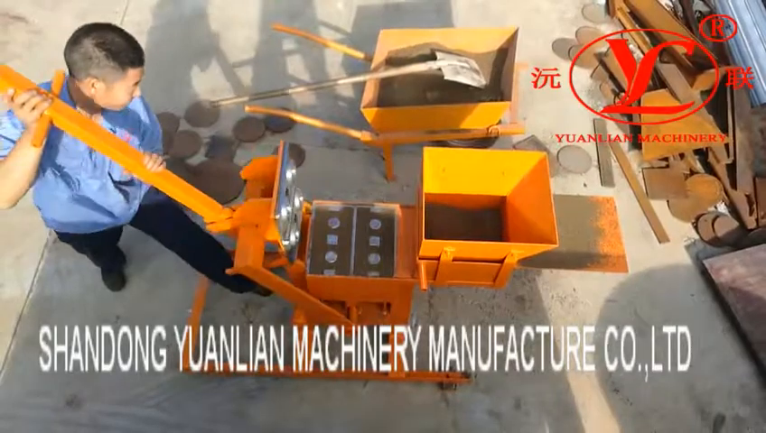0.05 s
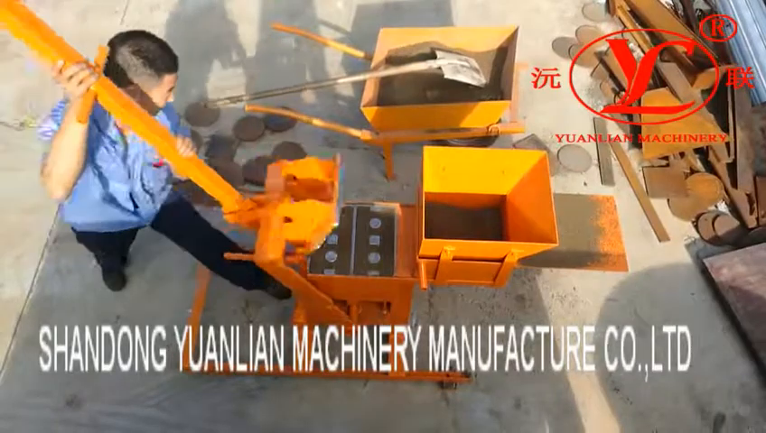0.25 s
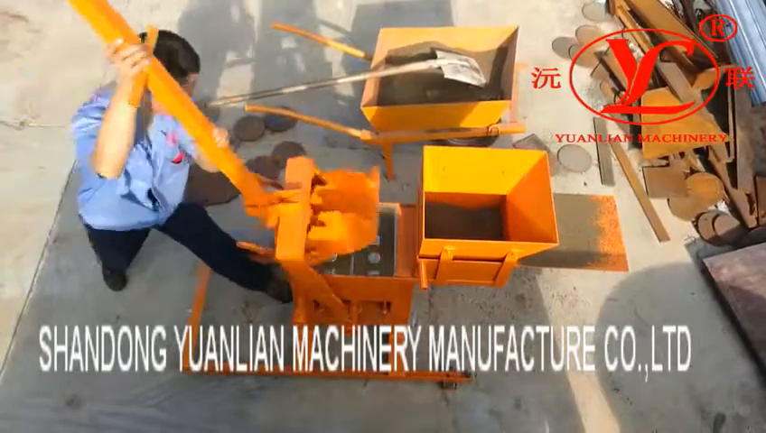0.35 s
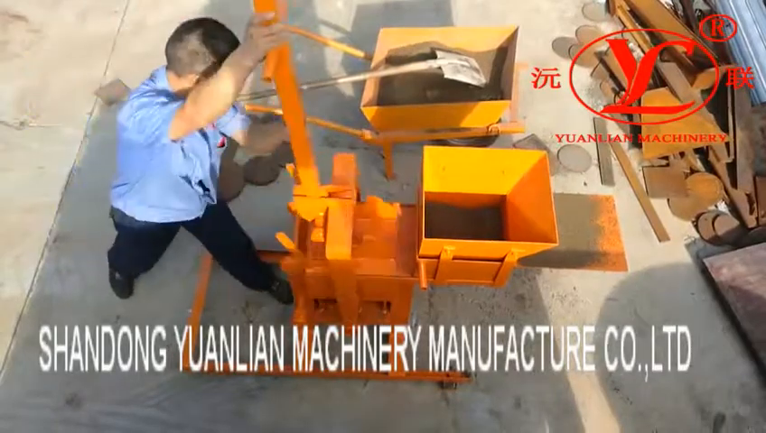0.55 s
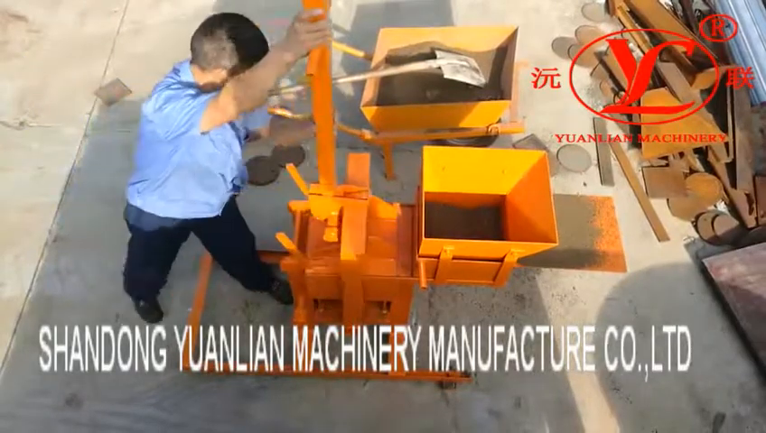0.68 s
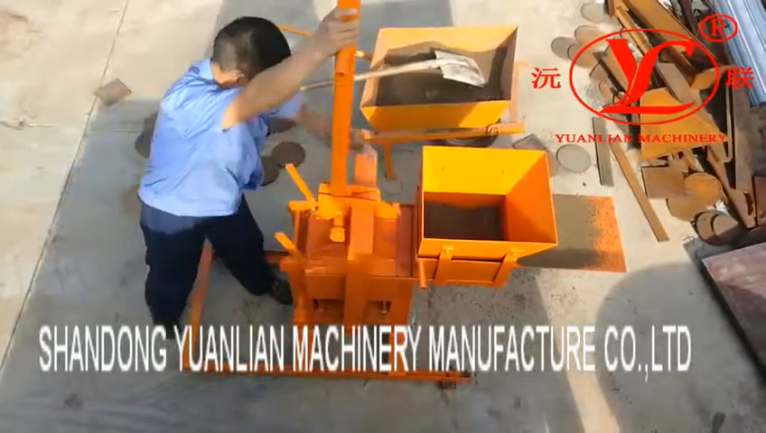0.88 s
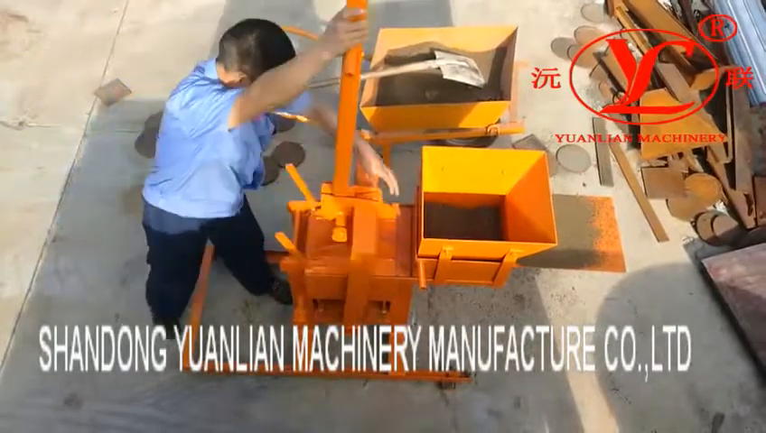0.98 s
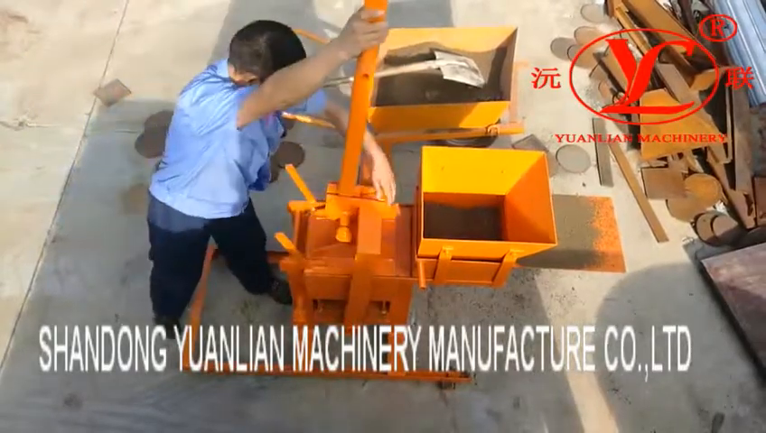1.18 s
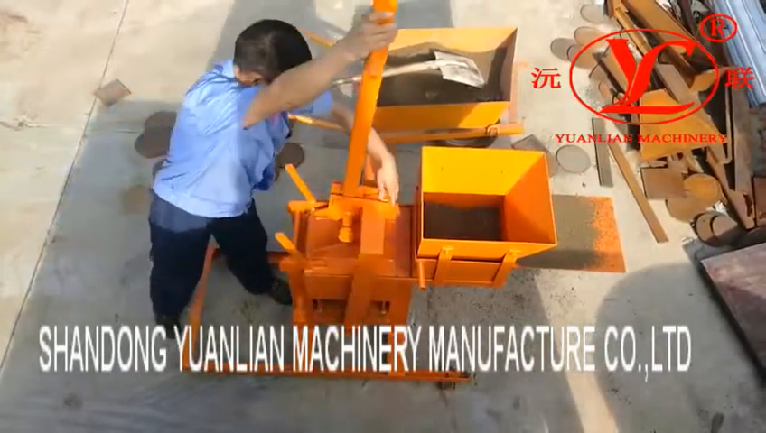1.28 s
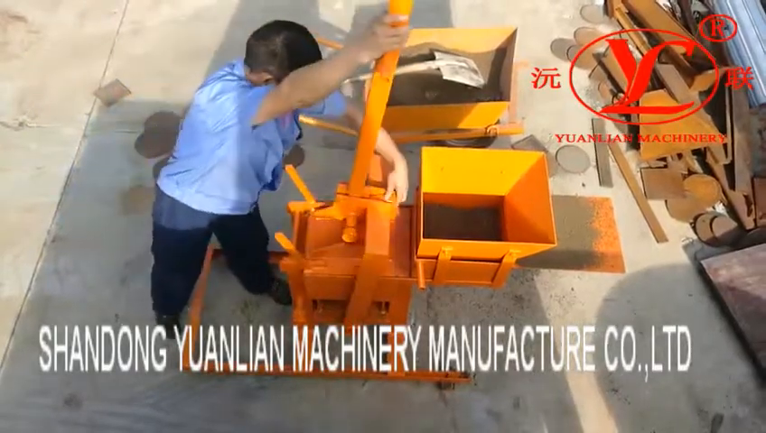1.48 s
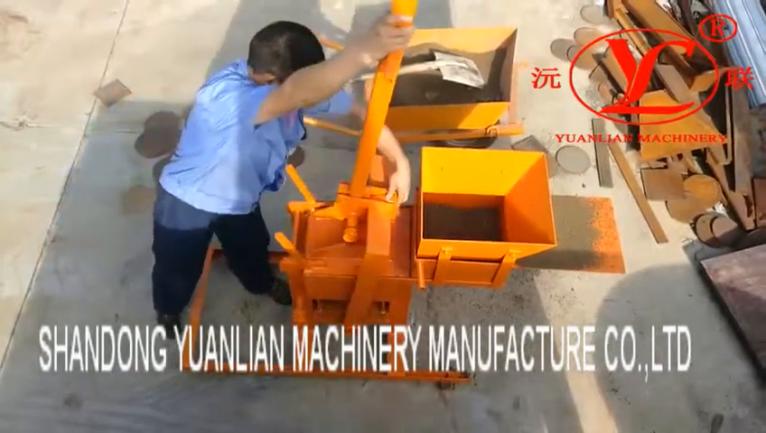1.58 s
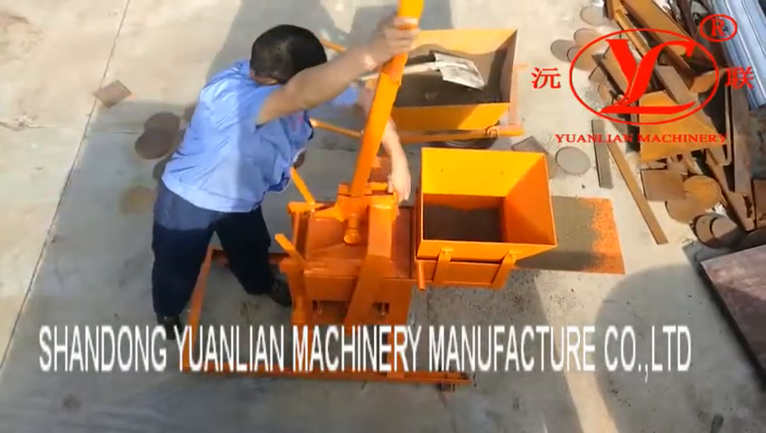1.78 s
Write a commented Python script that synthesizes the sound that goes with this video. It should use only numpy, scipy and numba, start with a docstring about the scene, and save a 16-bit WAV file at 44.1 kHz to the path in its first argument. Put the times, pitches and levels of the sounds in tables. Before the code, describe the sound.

One loud, crashing metal clank from a closing press lid, chattering and bouncing once, then a low fading ring in an open yard, over faint far-off machine whine and rumble, picked up by a nearby phone.

```python
"""A yard: a heavy steel lid drops onto a press mould; its edges land within 50 ms, chatter, ring, rebound once.
Pushes and rattle excite lid and frame modes; decaying noise gives crash, crack and yard echo.
Far off, a cutting or grinding machine: grit through resonances, plus hiss, over a low town rumble.
Faint thin tones and one soft scuff are added.
The phone's gain control ducks at the clank and stays low; the loudest peaks clip softly."""
import sys
import numpy as np
from scipy import signal
from scipy.fft import rfft, irfft
from scipy.io import wavfile
from scipy.ndimage import uniform_filter1d
from numba import njit

SR = 44100
rng = np.random.default_rng(int(sys.argv[2]) if len(sys.argv) > 2 else 0)


def int16_out(signal):
    """Quantize to a 16-bit WAV file."""
    q = np.round(np.clip(np.atleast_2d(signal).T, -1, 1) * 32767)
    wavfile.write(sys.argv[1], SR, q.astype(np.int16))


N = 81585

# town rumble, relative spectrum: freq_hz, density_db
TOWN_SPECTRUM = [(25, -5), (100, -2.1), (270, -3), (400, -7.5), (600, -11), (900, -5), (1700, -5.5),
                 (2300, -55)]
TOWN_DB = -42.5

# far machine hiss, relative spectrum: freq_hz, density_db
HISS_SPECTRUM = [(1200, -41.5), (1750, -68), (2000, -4), (2400, -3.5), (3100, -7.5), (3600, -9.5),
                 (4500, -4), (4950, -12), (5400, -8), (6600, -14.5), (7500, -5.5), (9000, -20.5),
                 (11500, -19), (13000, -31), (15500, -44)]
# far machine resonances: pitch_hz
MACHINE_PITCHES = [1960, 2015, 2095, 2270, 2338, 2405, 2475, 2745, 2860, 3397, 3500, 3640, 4300, 5300, 6200,
                   7470, 8500, 10050]
# same resonances: width_hz, relative_level_db
MACHINE_RINGS = [(11.4, 1.5), (14, -68), (18, 0.5), (34, 3), (23.1, 2), (17, -14), (17.3, 0.5),
                 (25.1, -3.5), (20, -9), (23.2, -2.5), (29.7, -2.5), (28, -4), (55.6, -6.5), (74, 1.5),
                 (60, -10), (75, -7.5), (215, -2), (120, -17)]
# far machine load: time_s, gain_db
MACHINE_LOAD = [(0, 0.7), (.2, 0.3), (0.502, 3), (.75, -0.3), (1.099, 0.4), (1.45, 1), (1.85, 0)]
# left/right shared power of the far sounds: freq_hz, share_0_to_1
FAR_LIKENESS = [(60, .99), (130, .98), (290, .85), (640, .3), (1400, .15), (3000, .15)]
# tilt of the far sounds: freq_hz, left_minus_right_db
FAR_PAN = [(200, -0.9), (1300, -0.9), (2400, 9), (4400, -0.7), (9000, 1.1)]
HISS_DB, MACHINE_RINGS_DB = -32.5, -30
# dB per unit of random walk (flicker, waver) or of exponential draw (grit)
FLICKER_DB, WAVER_DB, GRIT_DB = 2.5, 2, 2

# faint thin tones: start_s, length_s, pitch_hz, level_db
SQUEAKS = [(-.05, 0.74, 2025, -26), (0.682, 0.3, 2337, -32), (0.979, 0.12, 2873, -33),
           (1.075, 0.18, 906, -43.5), (1.24, 0.084, 3520, -37), (1.277, .3, 2301, -31),
           (1.573, 0.25, 2290, -34.5)]
# soft shuffle near the press: start_s, length_s, level_db
SCUFFS = [(1.522, .045, -43)]
# shuffle, relative spectrum: freq_hz, density_db
SCUFF_SPECTRUM = [(100, -8), (400, 0.1), (1200, -4), (2500, -14), (6000, -40), (9000, -70)]

# lid landings: start_s, level_db, nominal_contact_ms, treble_crack_db
LANDINGS = [(0.239, -17, 0.11, -31), (.245, -4, 0.61, -11), (0.248, -6.5, 0.18, -8),
            (0.255, -7.5, 0.74, -8.5), (0.2583, -4, 0.55, -7.5), (0.2614, -7, 0.39, -3.5),
            (0.265, 0, 0.96, -7), (0.269, -10.5, 0.27, -9), (0.272, -5.5, 0.36, -13.5),
            (.275, -3.5, 0.13, -19), (.278, -2.5, 0.19, -32), (0.284, -12.5, 0.12, -42),
            (.288, -29, 0.13, -41), (0.365, -19.5, .1, -19.5)]
# lid and mould modes: pitch_hz
LID_PITCHES = [553, 1035, 1084, 1153, 1198, 1403, 1525, 1962, 2240, 2402, 2467, 2853, 3990, 4780]
# same modes: relative_level_db, t60_s, left_minus_right_db
LID_MODES = [(-12.5, .16, -4), (-38, 0.12, 2), (-27, 0.099, -5), (3, 0.14, 0.5), (-4, 0.18, -2),
             (-12.5, 0.1, -8), (-22, 0.24, -9), (-12, 0.11, 3.0), (-7.5, 0.077, 20.5), (-2, 0.054, 25),
             (-10, .18, 12), (-7, 0.087, -10), (-3.5, 0.017, -28.5), (-9.5, 0.036, -22)]
# lid weight settling on the frame: start_s, level_db, nominal_contact_ms
THUDS = [(.247, -23, 2), (.259, -10.5, 1.54)]
# frame modes: pitch_hz
FRAME_PITCHES = [45, 181, 250, 272, 289, 306]
# same modes: level_db, t60_s
FRAME_MODES = [(-10, 0.1), (-18, 0.71), (-21, 0.52), (-24.5, 2.3), (1.5, 0.45), (-2.5, 0.35)]
# broad crash, relative spectrum: freq_hz, density_db
CRASH_SPECTRUM = [(30, -20), (130, -28), (300, -16), (650, -14), (1100, 0), (2500, -2), (3200, -14),
                  (5000, -30)]
# treble crack, relative spectrum: freq_hz, density_db
CRACK_SPECTRUM = [(2000, -18), (3200, -3), (4000, 1), (5000, 2), (6500, -5), (9000, -8.5), (11500, -10.5),
                  (15500, -71)]
# yard echo, relative spectrum: freq_hz, density_db
YARD_SPECTRUM = [(59, -60), (100, -23.5), (292, 3.5), (505, -14), (1160, -11), (1680, -13.5), (2320, -10),
                 (3650, -18.5), (9000, -41), (11700, -60), (19800, -120)]
# left/right shared power of crash, crack and yard: freq_hz, share_0_to_1
LID_LIKENESS = [(40, 0.8), (300, 0.95), (640, 0), (1400, 1), (3000, 0.08), (7000, 0.07)]
# tilt of crash, crack and yard: freq_hz, left_minus_right_db
CRASH_PAN = [(300, -1), (1200, -1.2), (2400, 8.5), (4400, 0.5), (12000, -3)]
LID_DB, CRASH_DB = -12, 0
CHATTER_DB, CHATTER_T60_S, CHATTER_SPREAD_DB = -12.5, 0.015, 3.0
CRASH_T60_S, CRACK_T60_S = 0.066, 0.06
WALL_DELAY_S, WALL_DB, WALL_LOWPASS_HZ = 0.12, -23.5, 1260
YARD_DB, YARD_T60_S, YARD_DELAY_S = -19.5, 0.85, 0.018
FAR_LAG_MS, LID_LAG_MS = 0.2965, 0.06  # left port hears later

DUCK_DB, DUCK_START_DB, DUCK_ATTACK_S, DUCK_RELEASE_S = -7, -17, 0.014, 40
QUICK_DB, QUICK_RELEASE_S = 1, 0.02
CLIP_AMPLITUDE, TOP_HZ = 1.03, 15400


def undb(db):
    """dB to gain."""
    return 10 ** (np.asarray(db) / 20)


def level(x, db):
    """Set the rms level."""
    return x * undb(db) / np.sqrt(np.mean(x ** 2))


def over_hz(table):
    """Interpolate a (freq_hz, value) table on log frequency at every transform bin."""
    points = np.array(table, float)
    bins_hz = np.arange(N // 2 + 1) * SR / N
    return np.interp(np.log(bins_hz + 1), np.log(points[:, 0]), points[:, 1])


def late(ms):
    """A delay, as a spectrum."""
    return np.exp(-2j * np.pi * np.arange(N // 2 + 1) * SR / N * ms / 1000)


def ring(x, hz, t60_s):
    """One resonance: its impulse response is a fading sine."""
    pole = np.exp(2j * np.pi * hz / SR - np.log(1000) / (t60_s * SR))
    return signal.lfilter([1], [1, -pole], x + 0j).imag


def walk(rate_hz):
    """Random levels held 1 / rate_hz, smoothed twice over that time."""
    hold = int(SR / rate_hz)
    steps = np.repeat(rng.standard_normal(N // hold + 1), hold)
    return 0.78 * uniform_filter1d(uniform_filter1d(steps, hold), hold)[:N]


def fade(t60_s, count):
    """Exponential decay."""
    return np.exp(-np.log(1000) * np.arange(count) / SR / t60_s)


def grit(spread_db):
    """Dense clicks of uneven size, rms 1."""
    return level(rng.standard_normal(N) * undb(spread_db * rng.exponential(size=N)), 0)


def colour(table):
    """Noise with a given spectrum, rms 1."""
    return level(irfft(rfft(rng.standard_normal(N)) * undb(over_hz(table)), N), 0)


def pushes(table):
    """A rounded push of unit area, scaled by level, for each (start_s, level_db, contact_ms)."""
    out = np.zeros(N)
    for start_s, db, contact_ms in table:
        push = signal.windows.hann(int(max(contact_ms, .05) * SR / 1000) + 3)
        first = int(start_s * SR)
        out[first:first + len(push)] += undb(db) * push / push.sum()
    return out


def after(t60_s, hits):
    """Decaying envelope after hits, summed as power."""
    power = signal.fftconvolve(hits ** 2, fade(t60_s, count=N) ** 2)[:N]
    return np.sqrt(power.clip(0))


def ports(shared, other, likeness, pan, lag_ms):
    """Two microphone ports: left hears shared, right mixes in other; tilt and lag separate them."""
    share = np.clip(likeness, 0, 1)
    shared, other, tilt = rfft(shared), rfft(other), undb(over_hz(pan) / 2)
    left = shared * tilt * late(lag_ms)
    right = (np.sqrt(share) * shared + np.sqrt(1 - share) * other) / tilt
    return np.array([irfft(left, N), irfft(right, N)])


def town():
    """Town rumble: steady noise with a low spectrum."""
    return undb(TOWN_DB) * colour(TOWN_SPECTRUM)


def machine(wavers, load):
    """Flickering grit rings the machine's parts, each wavering alone, beside a steady-grit hiss."""
    drive = grit(GRIT_DB) * undb(FLICKER_DB * walk(90))
    rings = np.zeros(N)
    for waver, hz, (width_hz, _) in zip(wavers, MACHINE_PITCHES, MACHINE_RINGS):
        rings += waver * level(ring(drive, hz, np.log(1000) / np.pi / width_hz), 0)
    highpass = signal.butter(4, 1700., "high", fs=SR, output="sos")
    rings = level(signal.sosfilt(highpass, rings), MACHINE_RINGS_DB)
    hiss = level(irfft(rfft(grit(GRIT_DB)) * undb(over_hz(HISS_SPECTRUM)), N), HISS_DB)
    return load * (rings + hiss)


def far():
    """Town and machine at two ports: the noise draws differ, wavers and load are common."""
    wavers = [undb(db + WAVER_DB * walk(4.65)) for _, db in MACHINE_RINGS]
    load = undb(np.interp(np.arange(N) / SR, *np.array(MACHINE_LOAD).T))
    shared = machine(wavers, load) + town()
    other = machine(wavers, load) + town()
    return ports(shared, other, over_hz(FAR_LIKENESS), FAR_PAN, FAR_LAG_MS)


def swell(start_s, length_s):
    """Rise and fall: root of a half sine."""
    phase = np.clip((np.arange(N) / SR - start_s) / length_s, 0, 1)
    return np.sin(np.pi * phase) ** .5


def squeaks():
    """Faint sines that swell and fade, wavering in level and phase."""
    t = np.arange(N) / SR
    tones = np.zeros(N)
    for start_s, length_s, hz, db in SQUEAKS:
        gain = undb(db + 1.3 * walk(50.3)) * swell(start_s, length_s)
        tones += gain * np.sin(2 * np.pi * hz * t + 1.3 * walk(30.46))
    return ports(tones, tones, 1, FAR_PAN, FAR_LAG_MS)


def scuff():
    """Shuffle: one swell of coloured noise, equal in both ports."""
    return sum(undb(db) * swell(start_s, length_s) for start_s, length_s, db in SCUFFS) * colour(SCUFF_SPECTRUM)


def lid_noise(envelope, spectrum):
    """Coloured noise under an envelope, partly alike at the two ports."""
    shared, other = envelope * colour(spectrum), envelope * colour(spectrum)
    return ports(shared, other, over_hz(LID_LIKENESS), CRASH_PAN, LID_LAG_MS)


def frame():
    """The lid's weight rings the frame's modes, equal in both ports."""
    force = pushes(THUDS)
    return sum(undb(db) * ring(force, hz, t60_s) for hz, (db, t60_s) in zip(FRAME_PITCHES, FRAME_MODES))


def lid_modes(hits):
    """Landing pushes and the rattle after them ring the modes of lid and mould."""
    chatter = undb(CHATTER_DB) * after(CHATTER_T60_S, hits) * grit(CHATTER_SPREAD_DB)
    force = pushes([row[:3] for row in LANDINGS]) + chatter
    force = signal.sosfilt(signal.butter(2, 300., "high", fs=SR, output="sos"), force)
    modes = np.zeros((2, N))
    for hz, (db, t60_s, pan_db) in zip(LID_PITCHES, LID_MODES):
        modes += undb(db + np.array([[pan_db / 2], [-pan_db / 2]])) * ring(force, hz, t60_s)
    return undb(LID_DB) * modes


def wall_echo(near):
    """One delayed, low-passed return off a far wall."""
    lowpass = signal.butter(2, WALL_LOWPASS_HZ, fs=SR, output="sos")
    return undb(WALL_DB) * signal.sosfilt(lowpass, np.roll(near, int(WALL_DELAY_S * SR), axis=1))


def yard_echo(hits):
    """Diffuse echo of the yard: delayed decaying noise with a softened onset."""
    envelope = np.roll(after(YARD_T60_S, hits), int(YARD_DELAY_S * SR))
    return undb(YARD_DB) * lid_noise(uniform_filter1d(envelope, size=600), YARD_SPECTRUM)


def lid():
    """Landings ring lid and frame, set off crash and crack noise, and echo."""
    hits = pushes([(start_s, db, 0) for start_s, db, _, _ in LANDINGS])
    sharp_hits = pushes([(start_s, crack_db, 0) for start_s, _, _, crack_db in LANDINGS])
    crash = undb(CRASH_DB) * lid_noise(after(CRASH_T60_S, hits), CRASH_SPECTRUM)
    crack = lid_noise(after(CRACK_T60_S, sharp_hits), CRACK_SPECTRUM)
    near = lid_modes(hits) + frame() + crash + crack
    return near + wall_echo(near) + yard_echo(hits)


def scene():
    """Town and machine far, small sounds, lid near."""
    return far() + squeaks() + scuff() + lid()


@njit
def follow(x, attack, release):
    """One-pole envelope with separate rise and fall coefficients per sample."""
    y, e = np.empty(len(x)), 0.
    for i in range(len(x)):
        e += (x[i] - e) * (attack if x[i] > e else release)
        y[i] = e
    return y


def record(dry):
    """Loud sound pulls the gain down for long, less a small brief lift; peaks clip softly; the top is cut."""
    power = uniform_filter1d(np.mean(dry ** 2, axis=0), size=200)
    loud = np.clip((10 * np.log10(power + 1e-12) - DUCK_START_DB) / 6, 0, 1)  # full duck 6 dB above start
    slow = follow(loud, 1 / (DUCK_ATTACK_S * SR), 1 / (DUCK_RELEASE_S * SR))
    quick = follow(loud, 1 / (DUCK_ATTACK_S * SR), 1 / (QUICK_RELEASE_S * SR))
    ducked = dry * undb(DUCK_DB * slow + QUICK_DB * quick)
    clipped = ducked / (1 + np.abs(ducked / CLIP_AMPLITUDE) ** 6) ** (1 / 6)
    return signal.sosfilt(signal.ellip(10, .2, 60, TOP_HZ, fs=SR, output="sos"), clipped)


dry = scene()
out = record(dry)
int16_out(out)
```